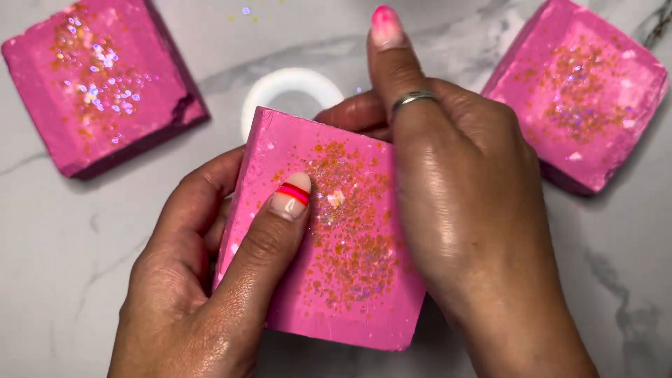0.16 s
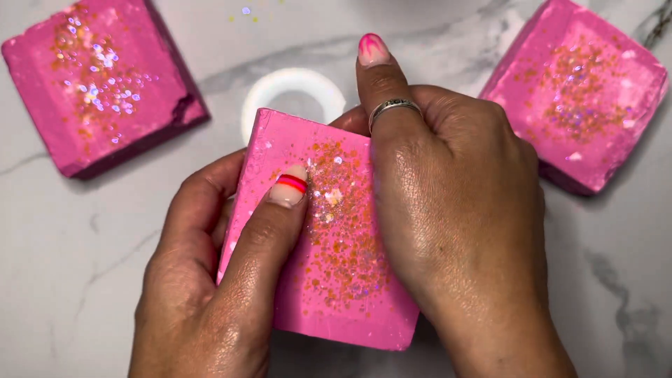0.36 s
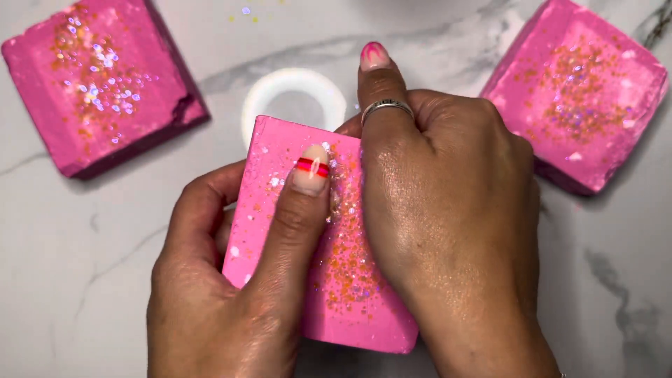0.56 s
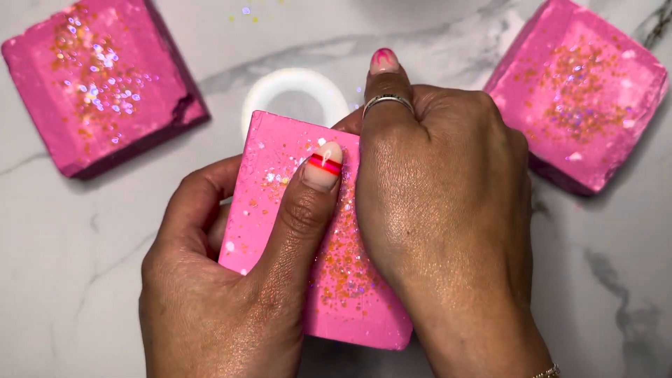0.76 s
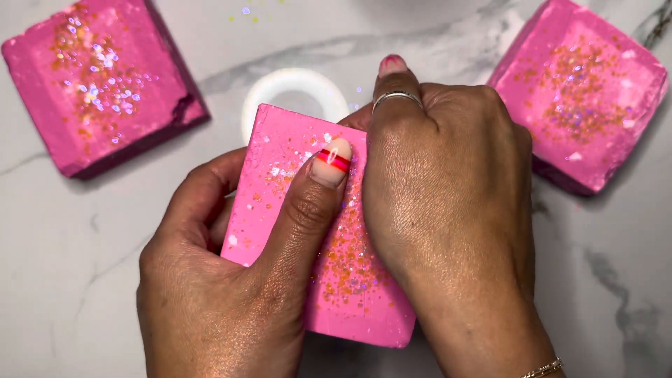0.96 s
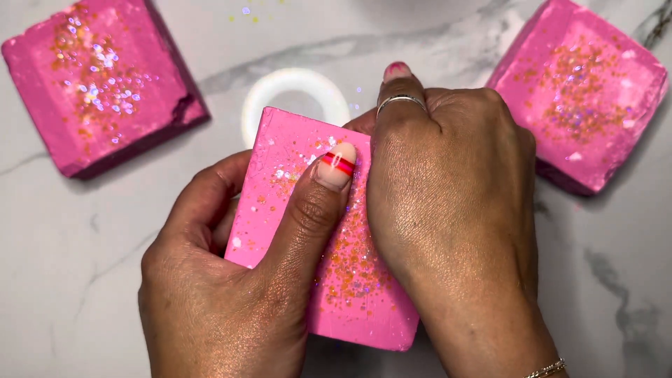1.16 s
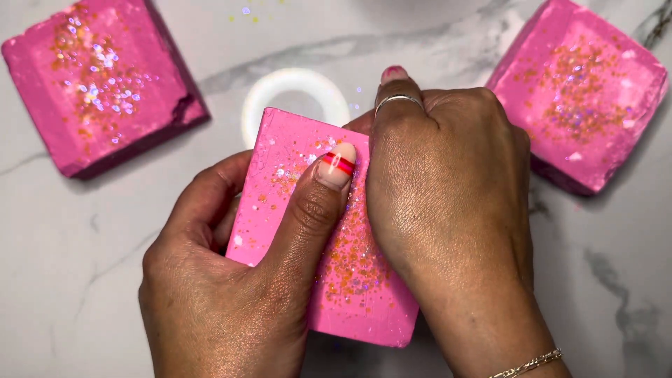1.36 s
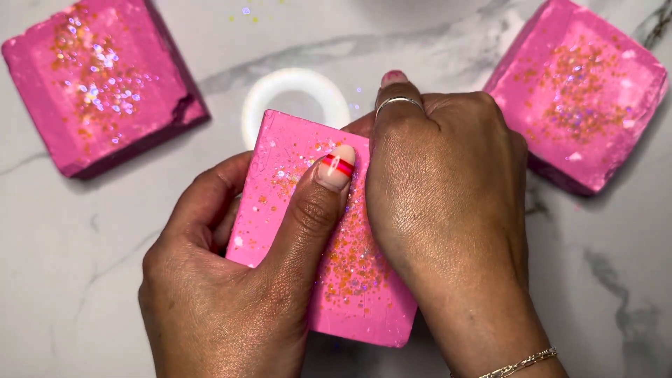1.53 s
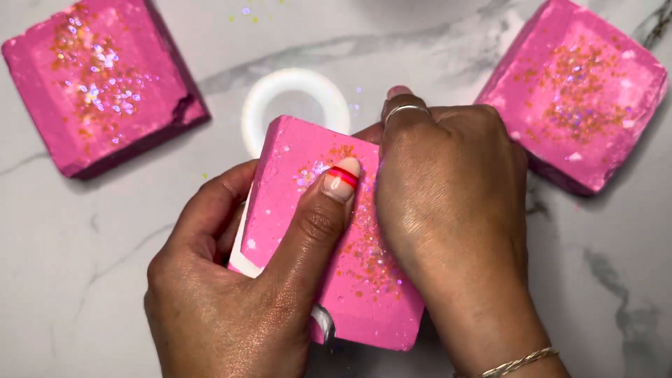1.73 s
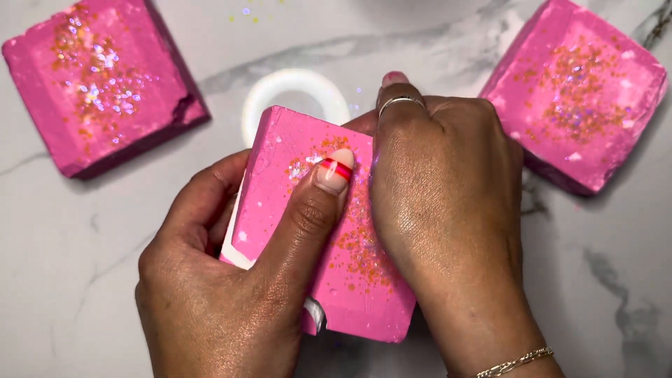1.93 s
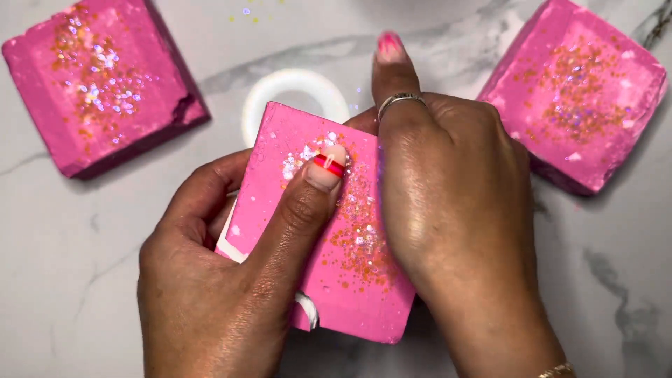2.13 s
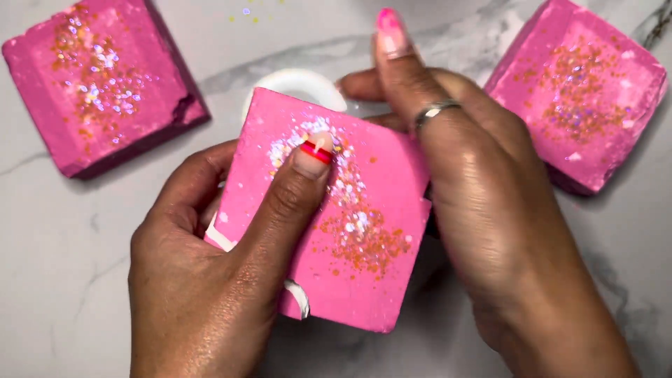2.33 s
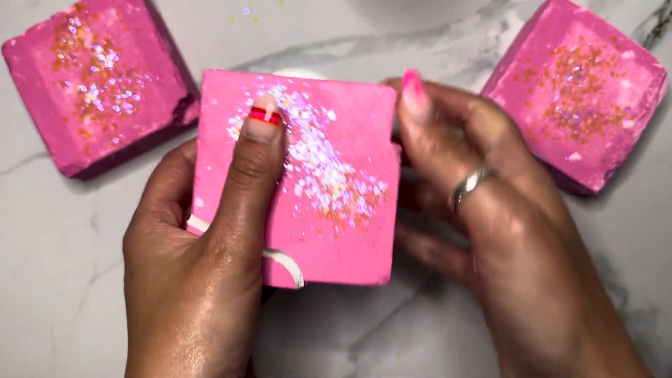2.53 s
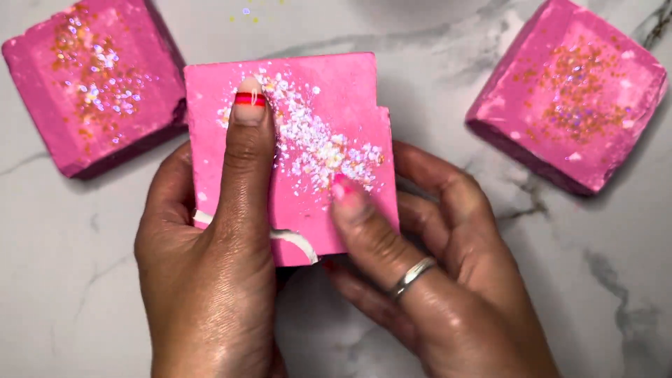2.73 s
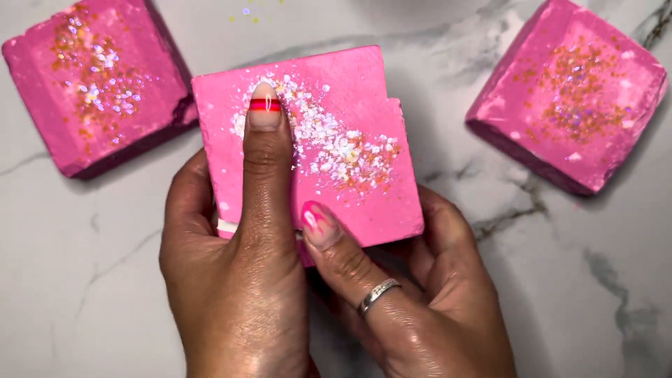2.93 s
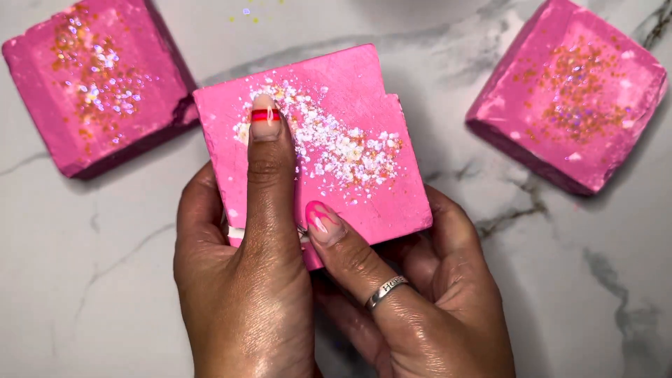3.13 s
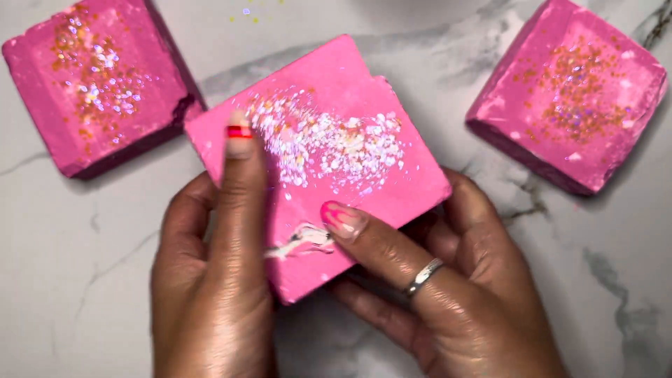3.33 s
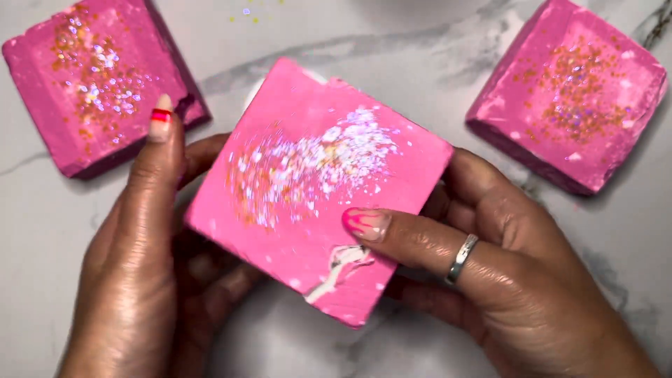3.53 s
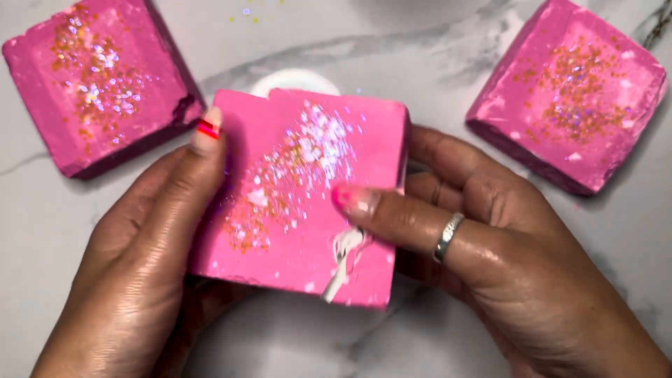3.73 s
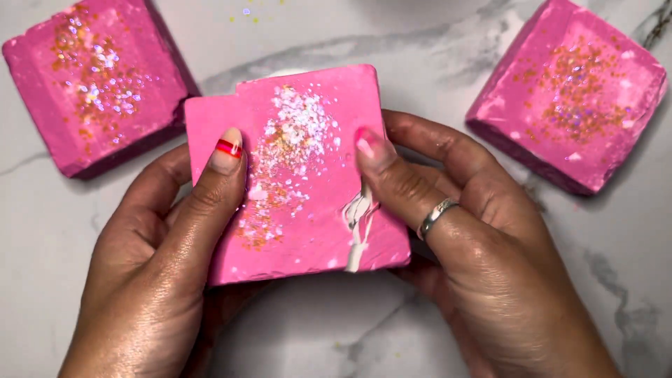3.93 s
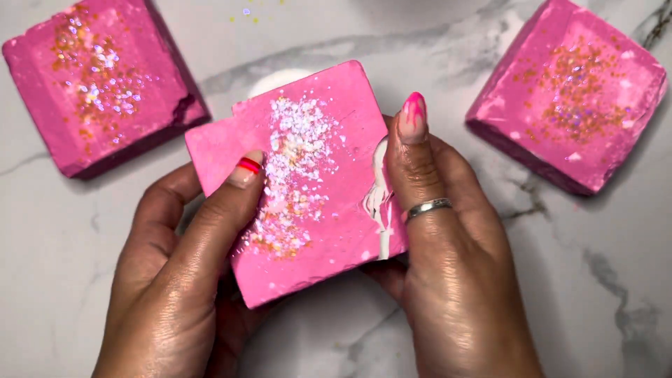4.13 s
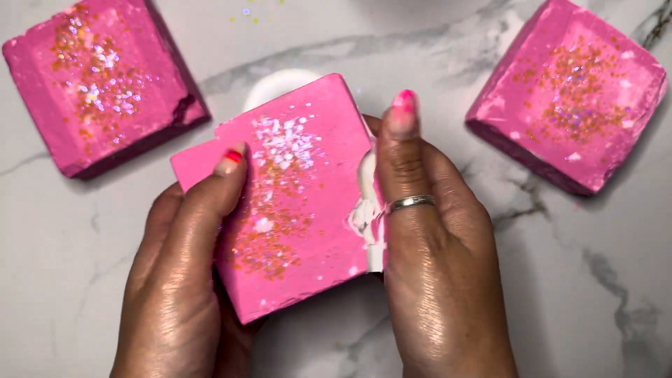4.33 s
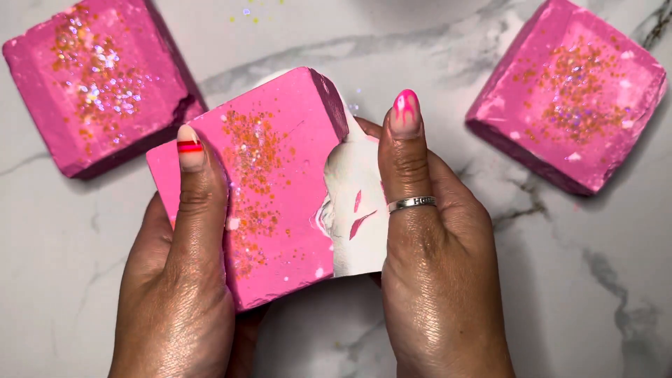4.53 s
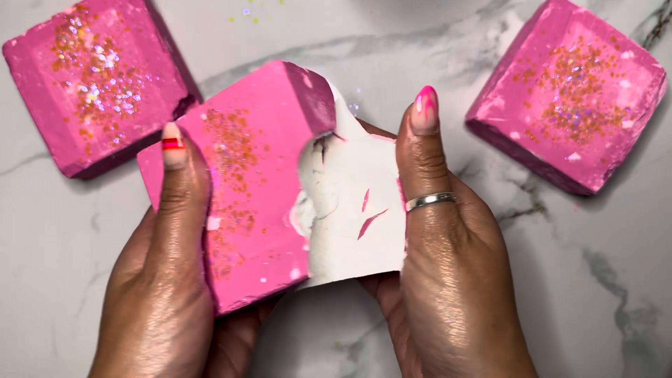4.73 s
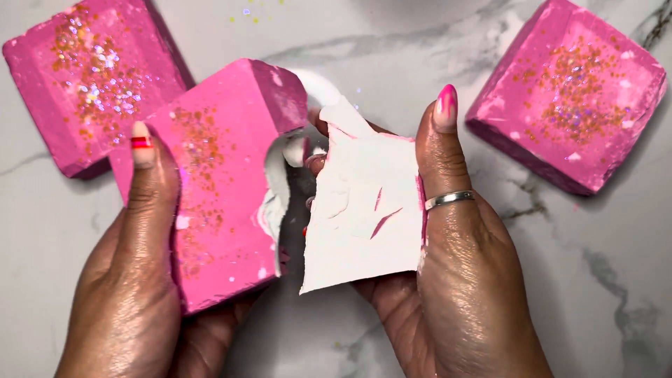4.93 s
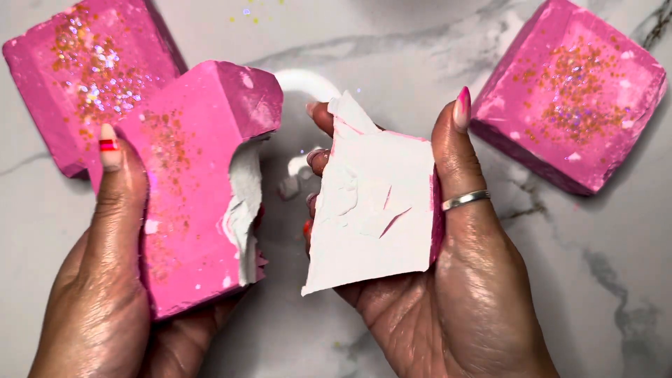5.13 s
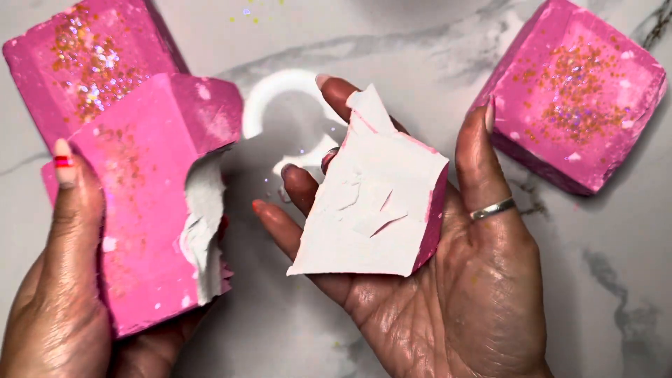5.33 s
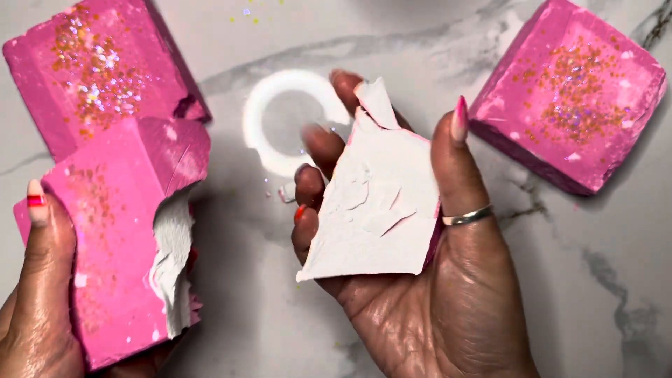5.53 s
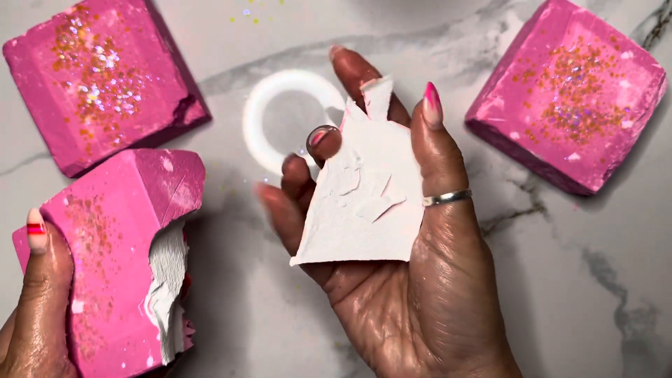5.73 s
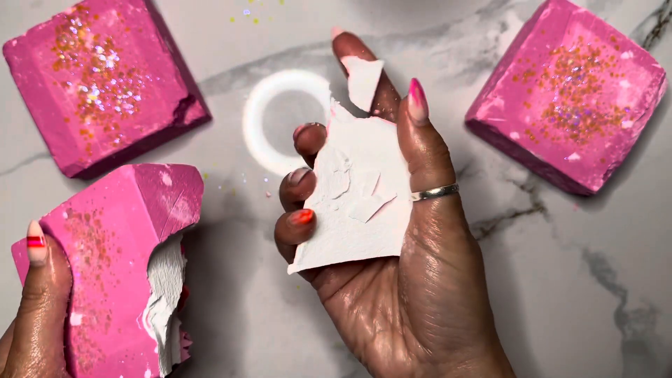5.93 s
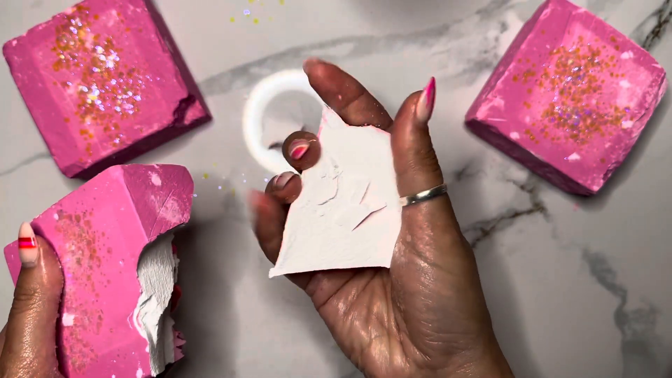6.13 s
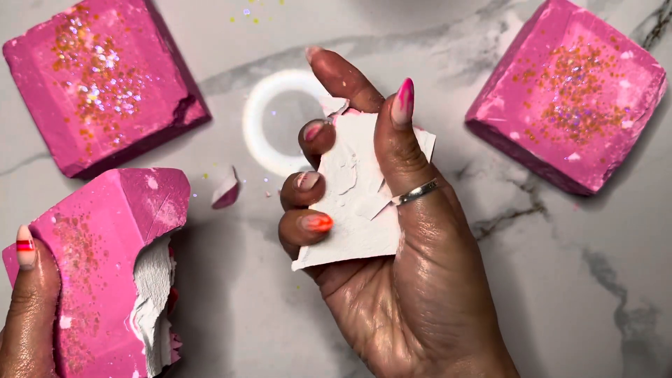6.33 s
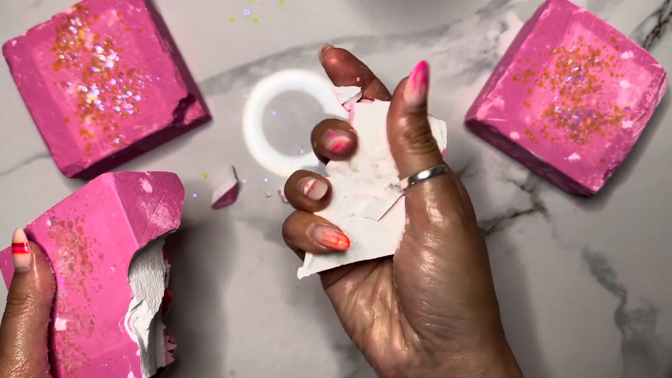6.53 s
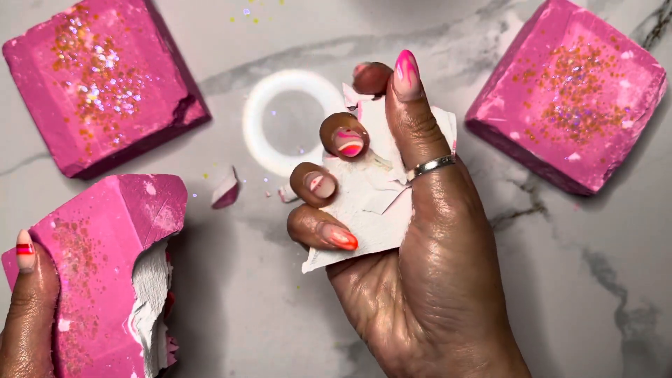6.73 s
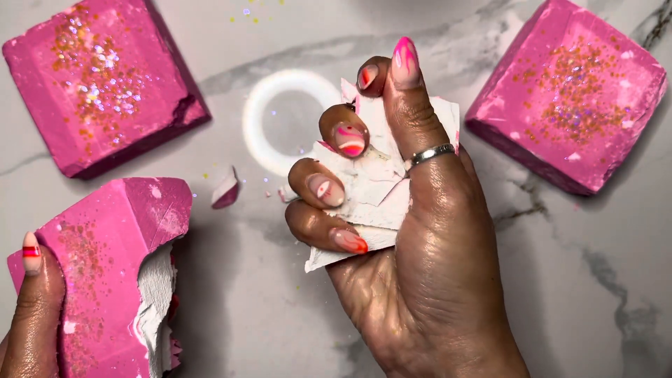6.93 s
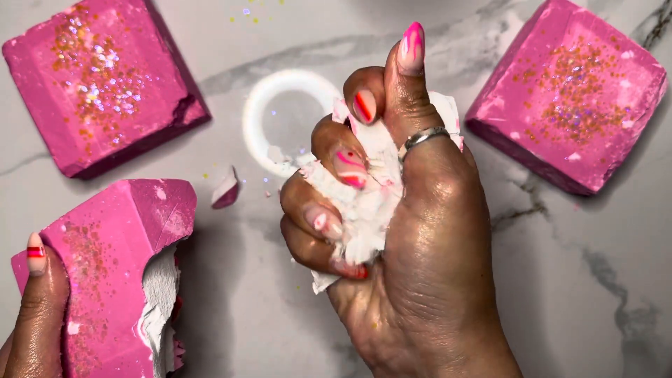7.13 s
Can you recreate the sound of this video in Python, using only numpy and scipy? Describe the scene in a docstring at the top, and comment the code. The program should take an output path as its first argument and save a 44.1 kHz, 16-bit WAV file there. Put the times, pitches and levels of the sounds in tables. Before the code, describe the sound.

Close-up brittle chalk cracking: a huge sharp snap, soft gritty rubbing, smaller cracks, then a burst of hard crunching in a fist, in a bare room.

```python
"""A block of chalk cracks, snaps twice and crumbles in the hands, close to a microphone above a stone counter.
Each split is a burst of noise that rings resonators; the loudest overload the input and clip.
Fingers rub the dusty faces: grainy noise, combed by the counter's echo. Jolts are damped swings.
A bare room answers with two decaying noise tails, over faint whistles, air noise and a low hum."""
import sys
import numpy as np
from scipy import signal
from scipy.io import wavfile
from scipy.ndimage import uniform_filter1d

SR = 44100
rng = np.random.default_rng(int(sys.argv[2]) if len(sys.argv) > 2 else 0)


def store_wav(level_fs):
    """Save 16-bit WAV to argv[1]."""
    pcm = np.round(np.clip(np.atleast_2d(level_fs), -1, 1) * 32767)
    wavfile.write(sys.argv[1], SR, pcm.T.astype(np.int16))


N = 316197  # length [samples]
SPLIT_S = 0.0017  # usual length of a small split [s]


def gain_of(db):
    """Level to amplitude: 20 dB is a factor of ten."""
    return 10 ** (np.asarray(db) / 20)


def evened(x):
    """Normalization of the mean power: scales to rms 1."""
    return x / np.sqrt(np.mean(x ** 2) + 1e-20)


def read(points, hz):
    """Interpolation along log frequency of a table (frequency [Hz], value)."""
    f, value = np.transpose(points)
    return np.interp(np.log(hz + 1), np.log(f + 1), value)


def add(mix, s, sound):
    """Superposition: adds a sound to the mix at time s [s]."""
    part = mix[round(s * SR):][:len(sound)]
    part += sound[:len(part)]


def wander(count, window):
    """Low-pass random fluctuation: noise averaged twice over a window [samples], at rms 1."""
    once = uniform_filter1d(rng.standard_normal(count), window)
    return evened(uniform_filter1d(once, window))


def coloured(x, points):
    """Minimum-phase filtering: the log spectrum alone fixes a causal response, here of unit energy."""
    hz = abs(np.fft.fftfreq(4096, 1 / SR))
    log_gain = np.log(gain_of(np.maximum(read(points, hz), -80)))
    taps = np.fft.ifft(np.exp(np.conj(signal.hilbert(log_gain)))).real[:2048]
    return signal.oaconvolve(x, taps / np.linalg.norm(taps))[:len(x)]


def resonate(x, hz, width):
    """Two-pole resonance: the bandwidth [Hz] sets the damping; the output has rms 1."""
    r = np.exp(-np.pi * width / SR)
    poles = [1, -2 * r * np.cos(2 * np.pi * hz / SR), r * r]
    return evened(signal.lfilter([1, 0, -1], poles, x))


def fracture(length, noise):
    """Brittle fracture: a split starts almost at once and dies within its length; a spikier crumb tail follows."""
    t = np.arange(len(noise)) / SR
    onset = 1 - np.exp(-t / 0.00011)
    split = np.exp(-(t / length) ** 2)
    crumbs = 0.21 * abs(noise[::-1]) ** 0.35 * np.exp(-t / 0.0073)
    return noise * onset * (split + crumbs)


def cracks():
    """Impulsive excitation of damped modes: each split rings its piece of chalk and spits treble."""
    # single splits: (time [s], peak level of the ring [dB], ring frequency [Hz],
    # treble rms re rms of the narrow ring [dB])
    splits = [(0.278, -47.5, 3430, 18), (0.343, -38, 11000, -6), (0.4761, -19.5, 3250, -33),
              (0.547, -26.5, 6400, -19), (0.83, -34.5, 11000, -14), (0.923, -41, 6300, -8),
              (0.945, -39, 6400, -11), (0.983, -35, 6400, -13), (1.0331, -40, 6400, -7),
              (1.148, -37, 6300, -25), (1.3008, -37, 1380, -14), (1.3647, -34.5, 1610, -30),
              (1.457, -32, 1140, -13), (1.4941, 0, 4000, -4.5), (1.507, -22, 2630, -22),
              (1.5918, 9, 1660, -30), (2.1811, -19, 3570, -26), (2.686, -28.5, 2970, -18),
              (3.163, -32.5, 1330, -24), (3.6262, -30, 3260, -19.5), (4.309, -39, 3800, -19),
              (4.366, -25, 10600, -16), (4.616, -16.5, 4080, -35), (4.646, -21, 3830, -20),
              (4.666, -25.5, 7070, -15), (4.697, -20, 3830, -17), (4.7108, -11.5, 3670, -22),
              (4.7155, -11.5, 8350, -20), (4.7198, -13, 6700, -27), (4.731, -22, 4300, -12),
              (5.0005, -8.5, 2840, -33), (5.007, -11.5, 1620, -36), (5.077, -23, 3530, -31),
              (5.2068, -26, 4260, -16), (5.449, -33, 3640, -19), (5.48, -30.5, 4370, -26),
              (5.6103, -31.5, 2320, -27), (5.912, -33, 6390, -23), (5.9578, -27, 6350, -18),
              (6.0738, 0, 2260, -39), (6.123, -15.5, 9000, -9), (6.1581, -13, 3040, -25),
              (6.4061, -18, 3230, 17), (6.4346, -1, 2200, 3), (6.446, -2, 3100, -15),
              (6.6347, -2, 5740, -30), (6.676, -26, 3800, -13), (6.7453, 1, 2700, -3.5),
              (6.7481, -4, 6000, -14), (6.8684, 1, 2780, -5), (6.872, 1.5, 3950, -24),
              (6.912, -14, 3040, -23), (6.9394, -18, 6720, -16), (6.951, -16.5, 3620, -5),
              (6.997, -17, 1210, -22), (7.021, -8, 1600, -25), (7.045, -22, 2570, -9),
              (7.0514, -14, 3040, -7), (7.0712, -10, 2340, -25), (7.0815, -7, 1890, -23),
              (7.0832, -18.5, 2650, -3), (7.0937, -8.5, 2980, -15), (7.1373, -2.5, 2220, -2)]
    length_spread = 0.14  # standard deviation of log length
    out = np.zeros(N)
    noises = rng.standard_normal((len(splits), 2049))
    for (s, db, hz, treble_db), noise in zip(splits, noises):
        split = fracture(SPLIT_S * np.exp(length_spread * noise[0]), noise[1:])
        broad_hz = np.sqrt(hz * 3000)
        broad = resonate(resonate(split, broad_hz, 5600), broad_hz, 7000)
        ring = resonate(split, hz, 0.53 * hz) + 0.23 * broad
        sound = ring + gain_of(treble_db) * resonate(split, 7600, 10000)
        add(out, s, gain_of(db) * sound / abs(ring).max())
    return out


def breaks():
    """Modal excitation of the whole block: a ragged near sound, and a blow of equal energy for the room."""
    # the block parts right through: (time [s], rms level over the split [dB], split length [s])
    partings = [(1.5859, 5.5, 0.002), (6.4122, 1.5, 0.0023)]
    # relative spectral density of each break: (frequency [Hz], density [dB])
    colours = [
        [(35, -77.5), (60, -8.5), (274, -1.5), (540, -1), (1190, -24), (1700, -13.5), (4420, -17.5),
         (8910, -12.5), (16000, -24)],
        [(35, -42), (60, 2.5), (427, -2), (1740, -11), (3110, -6), (8510, -9.5), (9560, -3), (14600, -28),
         (16000, -53)],
    ]
    # resonances of the pieces, dips if negative: (frequency [Hz], width [Hz], level re colour [dB])
    piece_rings = [
        [(349, 19, 4), (525, 190, 3), (1750, 170, 9), (2310, 67, 9), (3100, 97, 7.5), (5130, 310, 10),
         (5390, 150, 8), (6760, 86, 7), (8330, 280, -23), (9570, 730, 4.5), (9940, 270, -10)],
        [(3100, 270, 12), (3400, 330, 12.5), (3875, 280, 13), (4950, 810, 12.5), (6250, 610, 13),
         (10000, 550, 10)],
    ]
    near, far = np.zeros((2, N))
    hz = np.linspace(20, SR / 2, 1500)
    for (s, db, length), colour, rings in zip(partings, colours, piece_rings):
        lift = sum(top_db / (1 + (2 * (hz - f) / width) ** 2) for f, width, top_db in rings)
        ringing = np.transpose([hz, read(colour, hz) + lift])
        sound = coloured(fracture(length, rng.standard_normal(4096)), ringing)
        split_rms = np.sqrt(np.mean(sound[:round(length * SR)] ** 2))
        sound = gain_of(db) * sound / split_rms
        add(near, s, sound)
        blow = coloured(signal.unit_impulse(4096), ringing)
        add(far, s, np.linalg.norm(sound) * blow)
    return near, far


def crumbling():
    """Poisson-like hail of small fractures: random times and sizes, each with one of twelve crumb rings."""
    # spells of crumbling: (start [s], end [s], mean rate [crumbs/s], median peak at the start [dB], fade [dB/s])
    spells = [(4.993, 5.15, 150, -38, 60), (6.07, 6.3, 170, -26, 64), (6.42, 6.62, 220, -28, 67),
              (6.875, 7.17, 180, -30, 10)]
    # range of ring frequencies: (lowest ring [Hz], highest ring [Hz])
    ring_range = (700, 6000)
    t = np.arange(N) / SR
    out = np.zeros(N)
    chance = rng.random(N)
    size = gain_of(4.2 * rng.standard_normal(N))
    kind = rng.integers(0, 12, N)
    hail = np.zeros(N)
    for start, end, per_s, db, fade_db in spells:
        falls = (chance < per_s / SR) * (t > start) * (t < end)
        hail += gain_of(db - fade_db * (t - start)) * falls
    for k, hz in enumerate(np.geomspace(*ring_range, num=12)):
        crumb = resonate(fracture(SPLIT_S, rng.standard_normal(1024)), hz, 0.66 * hz)
        out += signal.oaconvolve(hail * size * (kind == k), crumb / abs(crumb).max())[:N]
    return out


def strain():
    """Microfracture under bending: sparse random ticks of uneven size, mostly treble."""
    # the bending: (start [s], end [s], mean rate [ticks/s], median peak level [dB])
    bending = (.55, 1.48, 40, -41)
    start, end, per_s, db = bending
    t = np.arange(N) / SR
    sizes = gain_of(db + 1.6 * rng.standard_normal(N))
    ticks = sizes * (rng.random(N) < per_s / SR) * (t > start) * (t < end)
    tick = resonate(resonate(fracture(0.0007, rng.standard_normal(256)), 12000, 10000), 10400, 10000)
    return signal.oaconvolve(ticks, tick / abs(tick).max())[:N]


def touch():
    """Contact pressure as gain: stroke powers add, and weight each stroke's echo peak and low band."""
    # skin and crumbs on chalk, one row a stroke: (start [s], rise [s], hold [s], level [dB],
    # first peak of the counter's echo [Hz], low band re level [dB])
    strokes = [(0.0, 0.0019, 0.02, -52, 3220, -28), (0.469, .01, 0.064, -44, 3270, -27),
               (0.562, .01, 0.29, -50.5, 3270, -29), (2.086, 0.015, 0.023, -38.5, 3400, -27),
               (2.363, 0.014, .005, -48, 3600, -14), (2.472, 0.0046, 0.064, -38, 3850, -15),
               (2.647, 0.024, 0.022, -54, 3380, -24), (2.825, 0.019, 0.037, -44.5, 3550, -7.5),
               (2.95, 0.022, 0.21, -56, 3360, -22), (3.154, 0.041, .005, -46.5, 3740, -22),
               (3.32, 0.0089, 0.12, -37, 3700, -21), (3.427, 0.037, 0.065, -39.5, 3170, -12),
               (3.532, 0.017, .15, -41, 3180, -13), (3.704, .01, .06, -52.5, 3150, -24),
               (3.741, 0.049, 0.1, -46, 3120, -13), (3.89, 0.064, 0.11, -46, 2900, -1.5),
               (4.002, 0.052, .03, -43.5, 3080, -12), (4.088, .01, 0.062, -50, 3900, -19),
               (4.139, .11, .005, -45.5, 3600, -35), (4.29, 0.017, .01, -41.5, 3950, -29),
               (4.343, .038, .02, -38.5, 3870, -20), (4.41, .01, 0.11, -55, 3850, -32),
               (4.486, 0.072, 0.022, -47.5, 4100, -27), (4.576, 0.032, 0.057, -41, 3800, -34),
               (4.688, 0.023, .003, -29, 3930, -14.5), (4.755, .005, 0.07, -52, 3900, -22),
               (4.86, 0.034, .005, -47.5, 3400, -22), (5.001, 0.0091, .003, -36.5, 3310, -15),
               (5.069, 0.016, .003, -38, 3230, -9), (5.11, .005, 0.066, -46.5, 3300, -22),
               (5.193, .01, 0.021, -40, 4100, -28), (5.286, 0.029, .003, -47.5, 3450, -26),
               (5.398, 0.096, 0.012, -47, 3630, -11), (5.593, 0.014, .003, -49, 3640, -22),
               (5.7, 0.064, .04, -58, 3260, -19), (5.889, 0.02, 0.0082, -45, 3790, -13),
               (5.947, .007, 0.059, -47.5, 3640, -9), (6.073, 0.009, .005, -31, 3490, 4),
               (6.146, .008, .003, -36.5, 3230, 5.5), (6.17, .01, 0.084, -53, 3250, 5),
               (6.447, .01, 0.12, -36, 3500, -19), (6.645, .005, 0.064, -45, 3560, -22),
               (6.76, .01, 0.072, -37.5, 3080, -22), (6.9, 0.0057, .09, -35.5, 3500, -13),
               (7.038, 0.039, .02, -39, 2800, -22), (7.128, 0.0068, 0.028, -39, 3310, -28)]
    rise_db, sag_db_per_s = 17.5, 58  # climb to the level, then sag
    lift_db_per_s = 359  # added to the sag as the skin lifts after the hold
    t = np.arange(0, N + 32, 32) / SR
    start, rise, hold, level_db, hz, low_db = np.transpose(strokes)[:, :, None]
    since = t - start - rise
    climb = rise_db * since / rise
    fall = -sag_db_per_s * since - lift_db_per_s * np.maximum(since - hold, 0)
    db = level_db + np.where(since < 0, climb, fall)
    power = gain_of(2 * np.maximum(db, -150)) * (t >= start) + 1e-15
    total = power.sum(axis=0)
    comb_hz = (power * hz).sum(axis=0) / total
    full_db = (power * low_db).sum(axis=0) / total
    return [np.interp(np.arange(N) / SR, t, c) for c in (np.sqrt(total), comb_hz, full_db)]


def patchy(x, depth_db):
    """Random modulation in narrow bands: they swell and fade as the touch moves over the face."""
    z = signal.stft(x, nperseg=256)[2]
    patches = uniform_filter1d(rng.standard_normal(z.shape), 2, axis=0)
    patches = uniform_filter1d(patches, 30, axis=1)
    return signal.istft(z * gain_of(depth_db * evened(patches)), nperseg=256)[1][:N]


def gliding(x, hz, width):
    """Heterodyne resonance along the curve hz: shift down to zero, smooth, shift back."""
    turn = np.exp(2j * np.pi * np.cumsum(hz) / SR)
    r = np.exp(-np.pi * width / SR)
    return evened((turn * signal.lfilter([1 - r], [1, -r], x / turn)).real)


def rubbing():
    """Sliding friction as dense grit with larger grains; interference with the counter's echo combs it."""
    # relative spectral density of the grit: (frequency [Hz], density [dB])
    rub_colour = [(760, -35), (1300, -5), (1820, -12), (2420, -1.5), (3110, 0), (4580, -1), (6480, 2),
                  (11500, -7), (16000, -18)]
    t = np.arange(N) / SR
    pressure, comb_hz, full_db = touch()
    grain_sizes = gain_of(6.3 * np.minimum(rng.exponential(1, N), 4))
    grains = grain_sizes * (rng.random(N) < 250 / SR)  # 250 grains/s on average
    slips_db = 1.6 * wander(N, 400)
    roughness = 1 + 2.8 * uniform_filter1d(grains, 24)
    grit = rng.standard_normal(N) * roughness * gain_of(slips_db)
    # delays of one and two periods of the comb's first peak
    echo = np.interp(t - 1 / comb_hz, t, grit)
    second_echo = np.interp(t - 1 / comb_hz, t, echo)
    combed = grit + 0.18 * echo + 0.095 * second_echo
    faces = evened(patchy(coloured(combed, rub_colour), depth_db=4.5))
    # the gap between hand and block sings at the first peak
    hollow = 0.36 * gliding(grit, comb_hz, 280)
    # a flat palm on the face sounds lower
    palm = gain_of(full_db) * resonate(resonate(grit, 1660, 2400), 1440, 2320)
    return pressure * (faces + hollow + palm)


def thuds():
    """Damped oscillation: a push through the hands and the counter swings and soon dies."""
    # jolts: (time [s], peak level [dB], frequency [Hz], decay to 1/e [cycles])
    jolts = [(0.476, -21, 664, 0.73), (1.585, -8, 530, 0.54), (1.587, -10, 53.3, 0.3),
             (3.762, -35.5, 55.7, 0.58), (4.369, -41, 135, 1.3), (4.693, -37, 74, 0.44),
             (4.716, -28, 650, 0.8), (4.999, -21, 770, 0.69), (5.079, -39.5, 51, 1.3),
             (5.949, -32, 177, 0.63), (6.077, -11.5, 810, 0.53), (6.155, -27.5, 135, 0.99),
             (6.413, -25.5, 57, 0.76), (6.416, -7.5, 285, 0.25), (6.435, -16, 596, 0.6),
             (6.633, -23.5, 328, 1.4), (6.674, -23.5, 700, 0.74), (6.746, -20.5, 137, 0.68),
             (6.867, -9.5, 383, 0.5), (6.939, -41, 56, 0.72), (6.996, -21.5, 380, 0.29),
             (7.021, -19.5, 790, 0.7), (7.081, -16.5, 189, 0.53), (7.137, -20.5, 700, 0.53)]
    out = np.zeros(N)
    for s, db, hz, cycles in jolts:
        turns = hz * np.arange(8000) / SR
        push = np.sin(2 * np.pi * turns) * np.exp(-turns / cycles)
        add(out, s, gain_of(db) * push / abs(push).max())
    return out


def room(x, side_db):
    """Reverberation as sparse echoes of random sign, each frequency band with its own decay time."""
    # reverberation time: (frequency [Hz], time to fall by 60 dB [s])
    decay_times = [(100, 0.88), (400, 0.79), (1500, 0.94), (4000, 0.86), (9000, 1), (14000, 0.4)]
    # colour of the tail: (frequency [Hz], level [dB])
    tail_colour = [(100, -5), (1000, 2), (7500, -1.5), (9300, 5.5), (10200, -6.5), (11000, 0), (16000, 0)]
    taps = np.zeros((2, SR))
    # one tap at random in every 20 samples
    at = np.arange(180, SR - 20, 20) + rng.integers(0, 20, (2, (SR - 181) // 20))
    np.put_along_axis(taps, at, rng.choice([-1., 1.], at.shape), 1)
    hz, t, z = signal.stft(taps, SR, nperseg=256)
    early = 1 + 1.26 * np.exp(-t / 0.025)  # near walls and the counter answer first
    # shape of the wide part of the tail: delayed onset, steep cut near 10 kHz
    wide_shape = (1 - np.exp(-(t / 0.056) ** 4)) / (1 + (hz[:, None] / 10300) ** 40)
    decay_db = read(tail_colour, hz)[:, None] - 60 * t / read(decay_times, hz)[:, None]
    z = z * np.array([early + 0 * wide_shape, wide_shape]) * gain_of(decay_db)
    tail = signal.istft(z, SR, nperseg=256)[1]
    tail = tail / np.linalg.norm(tail[0])
    mid, side = signal.fftconvolve(x[None], tail, axes=1)[:, :N]
    return mid + gain_of(side_db) * side * np.array([[1], [-1]])


def whistles():
    """Narrow-band noise: a narrow resonance makes a fuzzy pitch, whose level flutters at random."""
    # faint whistles: (start [s], end [s], frequency [Hz], width [Hz], level before flutter and fades [dB])
    bands = [(0, 0.063, 3100, 150, -56), (0.153, 0.32, 3240, 120, -57.5), (.55, 1.7, 6340, 350, -67),
             (.37, .42, 3240, 120, -58), (0.433, 0.53, 3180, 110, -58), (2.104, 3.1, 2310, 90.5, -64.5),
             (5.302, 6.5, 2330, 70.5, -62), (5.399, 6.068, 960, 110, -60.5), (5.21, 5.267, 4150, 80, -49)]
    out = np.zeros(N)
    for start, end, hz, width, db in bands:
        count = round((end - start) * SR)
        tone = resonate(rng.standard_normal(count), hz, width)
        flutter_db = 2.5 * wander(count, 900)
        fades = signal.windows.tukey(count, 0.3)
        add(out, start, gain_of(db + flutter_db) * tone * fades)
    return out


def air():
    """Stationary noise floor, a lumpy rumble and an appliance's fuzzy hum; a weak side signal adds width."""
    # relative spectral density of the air noise: (frequency [Hz], density [dB])
    air_colour = [(8.8, -42), (15, 6), (119, -5.5), (164, -5), (350, -10.5), (405, -9.5), (816, -15.5),
                  (5280, -22.5), (6470, -21.5), (11900, -27), (14700, -29), (16000, -42)]
    # hum: (frequency [Hz], width [Hz], rms level [dB])
    hum_bands = [(115.7, 8.1, -62), (236.4, 4.5, -60.5), (295, 5, -60.5), (353.2, 6.5, -60)]
    mid, side = rng.standard_normal((2, N))
    swell_db = 1.0 * wander(N, 3000)
    steady = gain_of(-50) * evened(coloured(mid, air_colour))
    rumble = gain_of(-63.5 + swell_db) * resonate(rng.standard_normal(N), 28, 37)
    hum = sum(gain_of(db) * resonate(rng.standard_normal(N), hz, w) for hz, w, db in hum_bands)
    wide = gain_of(-74) * resonate(side, 100, 180)
    return steady + rumble + hum + wide * np.array([[1], [-1]])


def scene():
    """Superposition of the direct sound, its reverberation and the background."""
    small = cracks() + crumbling()
    near, far = breaks()
    rub, low = rubbing(), thuds()
    sent = gain_of(-12.5) * small + gain_of(-43.0) * rub + gain_of(-5.5) * low
    wet = room(sent, side_db=-5) + room(gain_of(-10) * far, side_db=-1.5)
    return small + near + rub + low + wet + whistles() + strain() + air()


def record(dry):
    """Overload as hard clipping at full scale, followed by a linear-phase band limit."""
    edge_hz = 15950
    clipped = np.clip(dry, -1, 1)
    low_pass = signal.firwin(511, edge_hz, window=("kaiser", 9), fs=SR)
    return signal.oaconvolve(clipped, low_pass[None], "same")


dry = scene()
out = record(dry)
store_wav(out)
```